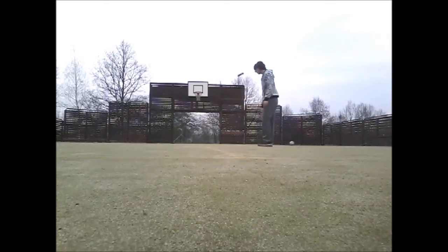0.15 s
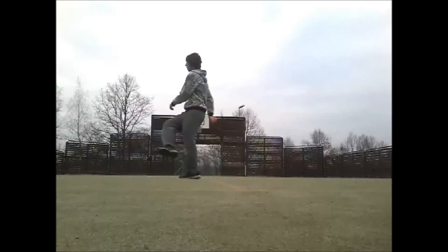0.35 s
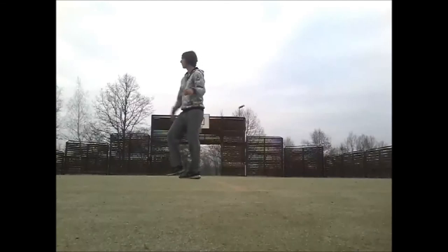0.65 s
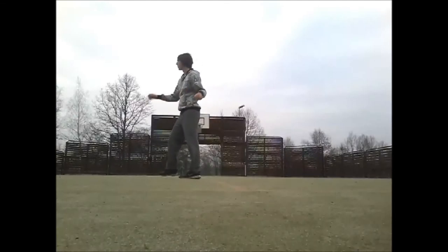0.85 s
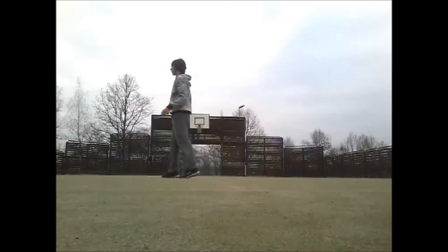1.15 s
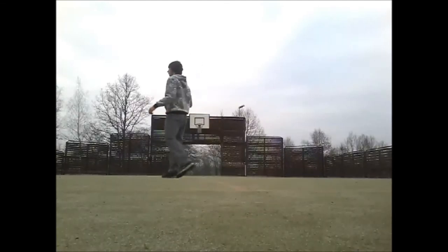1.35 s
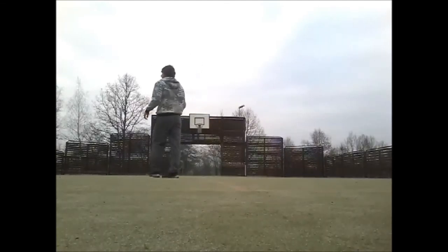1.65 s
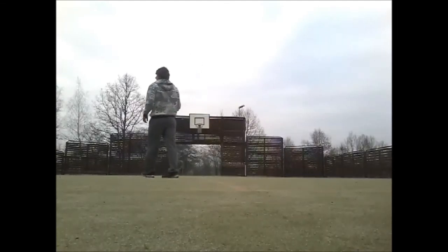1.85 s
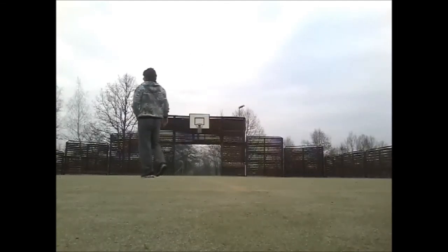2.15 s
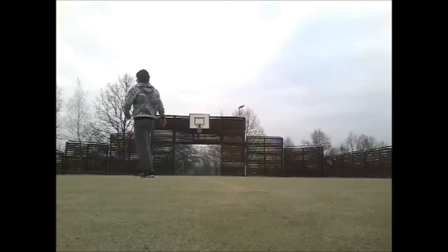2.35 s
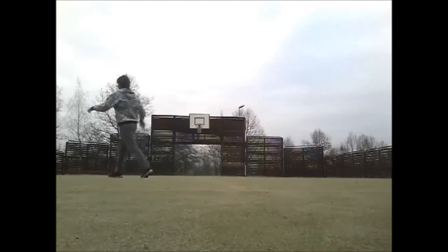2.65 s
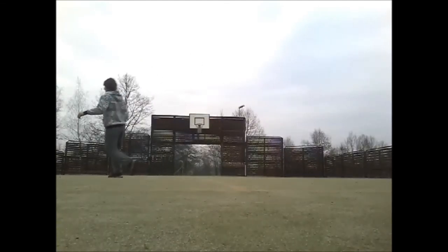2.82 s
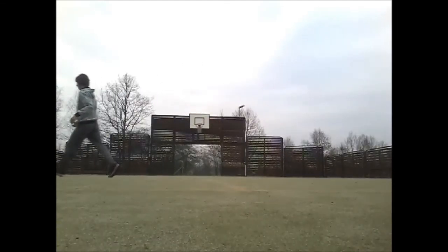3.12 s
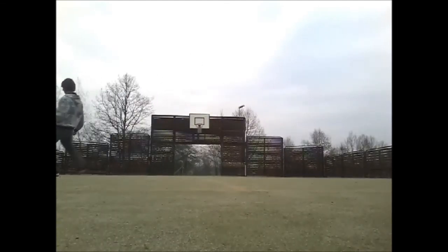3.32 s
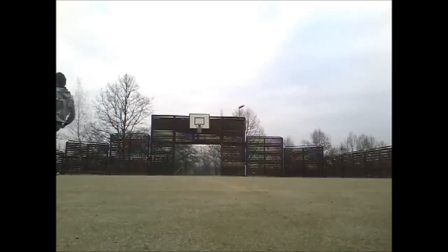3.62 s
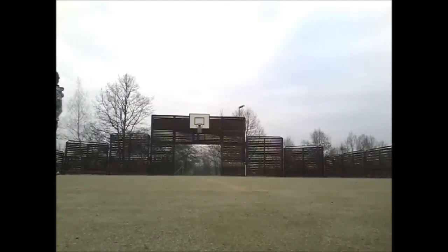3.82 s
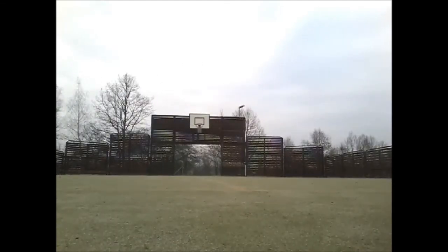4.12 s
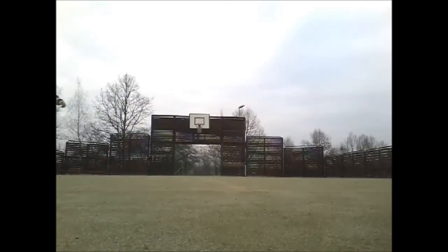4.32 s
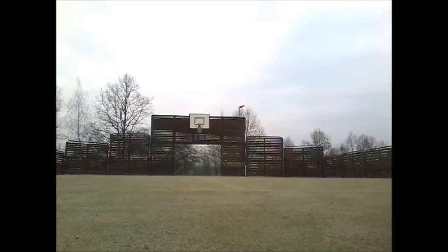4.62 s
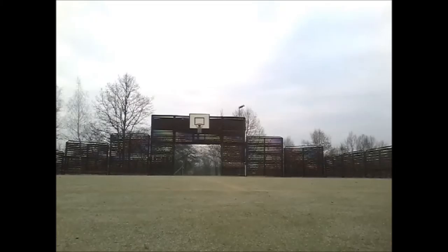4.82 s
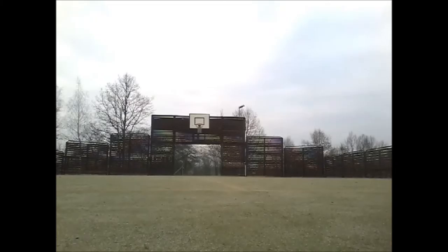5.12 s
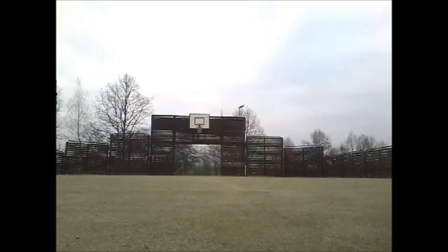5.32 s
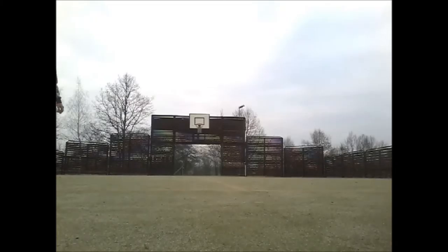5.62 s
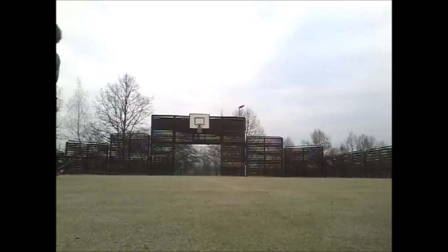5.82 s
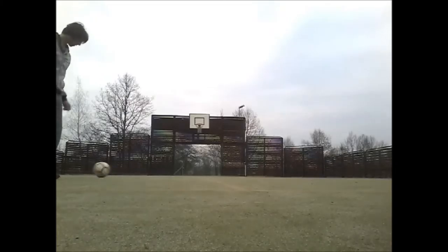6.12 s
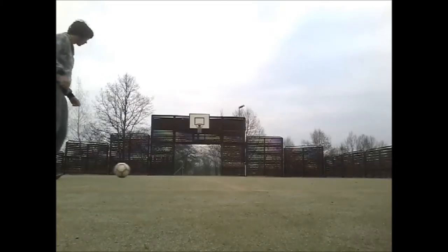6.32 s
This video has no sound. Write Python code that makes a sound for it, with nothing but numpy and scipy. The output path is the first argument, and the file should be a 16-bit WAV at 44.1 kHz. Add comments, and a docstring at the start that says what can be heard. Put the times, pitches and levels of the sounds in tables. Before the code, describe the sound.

Two football kicks each end in a clattering slam against a fence, followed by hops, gritty shoe scuffs and soft taps outdoors.

```python
"""A sanded artificial-grass court inside a slatted fence, heard from ground level.
Twice a football is kicked, skips and slams into the fence: the impact excites the panel's modes,
boards clatter on their steel frame, and the first slam leaves a loose slat rattling. The ball returns
in shortening hops and rolls on, ticking over its seams. Shoes grind the sand, the ball is stopped
and tapped along, and the fence reflects these sounds over a faint outdoor murmur."""
import sys
import numpy as np
from scipy import signal
from scipy.fft import rfft
from scipy.io import wavfile

SR = 44100
rng = np.random.default_rng(int(sys.argv[2]) if len(sys.argv) > 2 else 0)


def wav_record(signal):
    """Record a signal, one row per channel, as 16-bit PCM in the file named by sys.argv[1]."""
    frames = np.transpose(np.atleast_2d(signal))
    bounded = np.clip(frames, -1, 1)
    # unit amplitude maps onto the largest positive 16-bit level
    quanta = np.round(bounded * 32767).astype(np.int16)
    wavfile.write(sys.argv[1], SR, quanta)


N = 284886


def amp(db):
    return 10 ** (np.asarray(db) / 20)


def unit_rms(x):
    return x / np.sqrt(np.mean(x ** 2) + 1e-20)


def unit_peak(x):
    return x / np.max(abs(x))


def seconds(length):
    return np.arange(int(length * SR)) / SR


def decay(t, t60):
    """Exponential damping: 60 dB down after t60 seconds."""
    return np.exp(-np.log(1000) * t / t60)


def add(mix, start_s, sound):
    part = mix[max(round(start_s * SR), 0):][:len(sound)]
    part += sound[:len(part)]


def at_frequency(points, hz):
    """Interpolation on a logarithmic frequency axis."""
    known_hz, value = np.transpose(points)
    return np.interp(np.log(hz + 1), np.log(known_hz), value)


def click(spectrum, tilt_db=0, size=2048):
    """Minimum-phase pulse of unit energy, tilted by tilt_db per octave from 400 to 4000 Hz."""
    hz = abs(np.fft.fftfreq(size, 1 / SR))
    octaves = np.log2(np.clip(hz, 400, 4000))
    log_gain = np.log(amp(at_frequency(spectrum, hz) + tilt_db * octaves))
    pulse = np.fft.ifft(np.exp(np.conj(signal.hilbert(log_gain)))).real
    return pulse / np.linalg.norm(pulse)


def colour(x, spectrum, tilt_db=0):
    """Convolution with a pulse imposes its spectrum on x."""
    return signal.fftconvolve(x, click(spectrum, tilt_db))[:len(x)]


def ring(modes, t, signs=1):
    """Free vibration is a sum of damped sinusoidal modes."""
    hz, db, t60 = np.transpose(modes)[:, :, None]
    return np.sum(signs * amp(db) * decay(t, t60) * np.sin(2 * np.pi * hz * t), axis=0)


def grains(count, per_s, spread_db):
    """Shot noise: a random train of tiny, unequal impacts at unit rms."""
    size = amp(spread_db * np.minimum(rng.exponential(1, count), 3))
    return unit_rms(size * rng.choice([-1, 1], count) * (rng.random(count) < per_s / SR))


# Spectrum of the outdoor murmur. Each row: frequency in Hz, level in dB.
AIR_SPECTRUM = [(15, -54.5), (25, -20), (32, -11.5), (63, 3.5), (87, -6.5), (134, -2.5), (322, -9),
                (432, -7), (563, -10), (697, -9.5), (1220, -14), (2940, -19), (4380, -26.5), (6190, -20.5),
                (14500, -21.5)]
# Its envelope. Each row: time in seconds, level in dB.
AIR_ENVELOPE = [(0, -62.5), (.15, -64), (.23, -67.5), (1.9, -67), (2.45, -70.5), (3.2, -67.5),
                (6.46, -66.5)]


def air():
    """Ambient noise: a faint outdoor murmur."""
    gain = amp(np.interp(np.arange(N) / SR, *np.transpose(AIR_ENVELOPE)))
    return gain * colour(rng.standard_normal(N), AIR_SPECTRUM)


def hiss_burst(start_s=0.331, db=-61.5, t60=.7):
    """Decaying white noise: a brief, faint burst of hiss is heard at the first kick."""
    out, t = np.zeros(N), seconds(0.59)
    add(out, start_s, amp(db) * decay(t, t60) * rng.standard_normal(len(t)))
    return out


# Reflections from the sides of the court. Each entry: delay in seconds.
ECHO_DELAYS = [.0207, .036, .041, .063, .0795, .0865, .095, .108, .123, .153, .188]
# Spectrum of the reflected sound. Each row: frequency in Hz, level in dB.
ECHO_SPECTRUM = [(50, -15), (150, -15), (300, 4), (600, 0.5), (1500, -1), (2600, -0.5), (4000, -7),
                 (7000, -5), (14000, -13)]
# Reverberation time of the court. Each row: frequency in Hz, t60 in seconds.
REVERB_TIMES = [(80, 0.94), (500, 0.52), (1500, 0.55), (2500, 0.44), (4500, .4), (10000, 0.34)]


def court(x, echo_db, tail_db, fade_db_per_s=79):
    """Reflection adds echoes, smeared by the slats, and a diffuse tail that loses its treble first."""
    t, echoes = seconds(1), np.zeros(SR)
    for delay in ECHO_DELAYS:
        smear = 0.11 * rng.standard_normal(SR) * decay(t, .018)
        smear[0] += .8
        add(echoes, delay, amp(-7 - fade_db_per_s * delay) * smear)
    hz, when, bands = signal.stft(grains(SR, per_s=2000, spread_db=2), SR, nperseg=256)
    t60 = at_frequency(REVERB_TIMES, hz)[:, None]
    tail = signal.istft(bands * decay(when, t60), SR, nperseg=256)[1][:SR]
    tail *= 1 - np.exp(-(t / 0.12) ** 2)
    tone = click(ECHO_SPECTRUM)
    response = amp(echo_db) * echoes + amp(tail_db) * tail / np.linalg.norm(tail)
    response = signal.fftconvolve(response, tone / np.max(abs(rfft(tone))))
    return x + signal.fftconvolve(x, response)[:N]


# Spectrum returned by whole panels. Each row: frequency in Hz, level in dB.
PANEL_ECHO_SPECTRUM = [(40, -7.5), (90, -1.5), (320, 1), (500, -27), (1500, -12), (2500, -24.5),
                       (5000, -43.5), (14000, -59)]
# Their echoes. Each row: delay in seconds, gain in dB.
PANEL_ECHOES = [(0.038, -6), (0.088, -22), (.178, -14.5), (.189, -18)]


def panel_echoes(x):
    """Long waves do not slip between the slats: whole panels reflect them as dull bumps."""
    out = np.zeros(N)
    dull = colour(x, PANEL_ECHO_SPECTRUM) / np.max(abs(rfft(click(PANEL_ECHO_SPECTRUM))))
    for delay, db in PANEL_ECHOES:
        add(out, delay, amp(db) * dull)
    return out


def slat_scatter(x, rise_s=.11, t60=0.31, band_hz=(900, 2300)):
    """Scattering: countless small echoes swell as the wave reaches more slats, then thin out."""
    t = seconds(.6)
    echoes = rng.standard_normal(len(t)) * decay(t, t60) * (1 - np.exp(-(t / rise_s) ** 4))
    band = signal.butter(2, band_hz, "bandpass", fs=SR, output="sos")
    response = signal.sosfilt(band, echoes / np.linalg.norm(echoes))
    return amp(-1) * signal.fftconvolve(x, response)[:N]


# The rolling ball. Each row: start and end in seconds, first and last level in dB.
BALL_ROLLS = [(1.717, 2.35, -69.5, -83), (4.896, 5.42, -65.5, -64), (6.127, 6.398, -60.5, -64.5)]


def seam_ticks(gap_s=.0617, jitter_s=0.0016, spread_db=2.5, length_s=0.019, scrape_db=-19.5):
    """Rolling contact: the ball drops from seam to seam almost periodically. Gives rows for sand()."""
    rows = []
    for start, end, start_db, end_db in BALL_ROLLS:
        for s in np.arange(start, end, gap_s):
            late, harder = rng.standard_normal(2)
            db = np.interp(s, [start, end], [start_db, end_db]) + spread_db * harder
            rows.append((s + jitter_s * late, db, length_s, scrape_db))
    return rows


# Hops back from the fence. Each row: first landing and end in seconds, level in dB.
FENCE_REBOUNDS = [(1.118, 1.7, -35.5), (4.196, 4.87, -36)]
# Successive landings. Each entry: level in dB relative to the first.
LANDING_DROPS = [0, -4, -18.5, -18.5, -24]


def landings(first_hop_s=.218, hop_loss=.283, loss_easing=.52, length_s=.018, scrape_db=-6):
    """Inelastic rebound: hops shorten, and gentler landings lose less. Gives rows for sand()."""
    rows = []
    for s, end, db in FENCE_REBOUNDS:
        hop = first_hop_s
        for k, drop_db in enumerate(LANDING_DROPS):
            if s < end:
                rows.append((s, db + drop_db, length_s, scrape_db + drop_db))
            s += hop
            hop *= 1 - hop_loss * loss_easing ** k
    return rows


# Contacts of shoes and ball with the turf. Each row: middle in seconds, level in dB,
# length in seconds, low scrape in dB relative to the grit.
TURF_SCUFFS = [(0.355, -77.5, 0.066, 17), (2.177, -68.5, .025, -15), (3.294, -58, 0.045, 1),
               (3.322, -61.5, 0.041, -11.5), (3.376, -69, 0.04, 2), (4.606, -48.5, 0.032, -3),
               (5.164, -62.5, 0.041, -4), (5.243, -61, 0.028, -9), (5.433, -48.5, 0.035, 1),
               (5.461, -38.5, 0.047, -0.5), (5.597, -62, 0.18, 9.5), (5.652, -46.5, 0.01, -8),
               (5.684, -54.5, 0.04, 0.5), (6.043, -57, 0.025, -4)]
BALL_BOUNCES = [(0.498, -46, 0.03, -2.5), (0.758, -47.5, 0.022, -22), (3.956, -43, 0.023, -4.5),
                (5.82, -47, 0.018, -26), (6.016, -44.5, 0.02, -2)]
# Spectra of sand under light and heavy load. Each row: frequency in Hz, level in dB.
GRIT_SPECTRUM = [(100, -22), (800, -6.5), (1700, -11.5), (2400, -1), (3200, 1.5), (4000, -1), (4700, -4.5),
                 (5500, -1.5), (6500, -7.5), (7100, -17), (9500, -32), (14000, -36)]
SCRAPE_SPECTRUM = [(40, -14.5), (150, -6), (560, -11), (1000, -3), (1450, -3), (2150, 0.5), (3000, -11),
                   (6000, -38.5), (14000, -51.5)]


def sand(floor_db=-76.5, echo_s=.04, echo_db=-14.5):
    """Granular friction: sand grinds under sole or ball, and weight adds a lower scrape."""
    t, light, heavy = np.arange(N) / SR, np.zeros(N), np.zeros(N)
    for middle, db, length, scrape_db in TURF_SCUFFS + BALL_BOUNCES + landings() + seam_ticks():
        u = np.clip((t - middle) / length, -5, 5)
        # the contact bites quickly and lets go more slowly
        stroke = amp(db) * np.exp(-np.where(u < 0, abs(u / 0.44) ** 5, abs(u / 0.56) ** 1.8))
        light += stroke
        heavy += stroke * amp(scrape_db)
    knots = np.arange(0, N / SR, 1 / 40)
    clumps = amp(1.7 * np.interp(t, knots, rng.standard_normal(len(knots))))
    light += amp(floor_db) * unit_rms(clumps)  # faint crunching between the scuffs
    grit = colour(light * grains(N, per_s=2600, spread_db=3.5), GRIT_SPECTRUM)
    scrape = colour(heavy * grains(N, per_s=5200, spread_db=2), SCRAPE_SPECTRUM)
    out = grit + scrape
    add(out, echo_s, amp(echo_db) * out)  # reflection from the nearest stretch of fence
    return out


# Footfalls and touches of the ball. Each row: start in seconds, peak in dB, tilt in dB per octave.
SOFT_TAPS = [(0.306, -38.5, 4.5), (2.021, -54.5, -16), (3.220, -41, 7.5), (3.343, -43, -6),
             (5.181, -45.5, -11), (5.651, -32, -6), (5.678, -30.5, 0.5), (5.721, -38.5, -0.5),
             (5.805, -33.5, 29), (6.053, -34, -1.5), (6.448, -38, 3)]
# Their spectrum. Each row: frequency in Hz, level in dB.
TAP_SPECTRUM = [(30, -24.5), (100, -5.5), (220, -2), (380, -2.5), (650, 0.5), (1100, -11), (2200, -16),
                (4000, -24), (6500, -31.5), (8000, -46), (14000, -66.5)]


def taps(settle_s=0.053, pat_tilt_db=4):
    """Heavily damped impacts: steps, touches and the pat that opens each bounce settle without ringing."""
    out, t = np.zeros(N), seconds(settle_s)
    bounces = BALL_BOUNCES + landings()
    pats = [(middle - .28 * length, db + 1, pat_tilt_db) for middle, db, length, _ in bounces]
    for s, db, tilt_db in SOFT_TAPS + pats:
        contact = 0.058 * rng.standard_normal(len(t)) * decay(t, settle_s)
        contact[0] = 1
        add(out, s, amp(db) * unit_peak(colour(contact, TAP_SPECTRUM, tilt_db)))
    return out


# Modes of the loose slat. Each row: frequency in Hz, level in dB, t60 in seconds.
SLAT_MODES = [(321, -13, 0.031), (414, -17.5, 0.036), (1010, -28, 0.026), (1323, 8.5, 0.0041),
              (1440, -6, 0.0091), (2110, -12.5, 0.021), (2870, -8.5, 0.0046)]
# Spectrum of the boards beside it. Each row: frequency in Hz, level in dB.
SHAKEN_SPECTRUM = [(60, -37), (200, -31), (330, 4), (600, 1.5), (1100, 4), (1450, 2), (2200, -14),
                   (3200, -12.5), (7000, -29), (14000, -30)]


def loose_slat(start_s=1.0447, swing_s=.0694, count=10, fade_db=18, limp_db=2):
    """Periodic impact: a swinging slat clacks against its rail and shakes the neighbouring boards."""
    out, t = np.zeros(N), seconds(.12)
    for k in range(count):
        # the clacks hold up, then die away; every other one is harder
        db = -17.5 - fade_db * (k / (count - 1)) ** 2 - limp_db * (-1) ** k
        clack = ring(SLAT_MODES, t * rng.uniform(0.917, 1.02)) * (1 - np.exp(-(t / 0.0016) ** 2))
        shaken = colour(rng.standard_normal(len(t)) * decay(t, 0.13), SHAKEN_SPECTRUM)
        add(out, start_s + swing_s * k, amp(db) * (unit_peak(clack) + amp(-8.5) * unit_peak(shaken)))
    # a narrow slat radiates little bass
    return signal.sosfilt(signal.butter(2, 520, "highpass", fs=SR, output="sos"), out)


# Runs of lesser knocks. Each row: start and length in seconds, initial level in dB,
# tilt in dB per octave.
BOARD_CLATTERS = [(0.954, 0.08, -19, -1.5), (4.085, .095, -23, 5.5)]


def lesser_knocks(count=4, fade_db_per_s=69.5, spread_db=1.5, t60=.035, clank_db=-13):
    """Dissipation: irregular knocks weaken as the fence settles. Gives rows for board_knocks()."""
    rows = []
    for start, length, db, tilt_db in BOARD_CLATTERS:
        delays = length * (np.arange(count) + rng.random(count)) / count
        levels = db - fade_db_per_s * delays + spread_db * rng.standard_normal(count)
        rows += [(s, level, tilt_db, t60, clank_db) for s, level in zip(start + delays, levels)]
    return rows


# The loudest knocks. Each row: start in seconds, board's peak in dB, tilt in dB per octave,
# t60 in seconds, steel clank in dB relative to the board.
LOUD_KNOCKS = [(0.857, -21.5, 1, 0.03, -2), (0.895, -7.5, 1.5, .02, -11.5), (0.8993, -11, 0, .063, -19),
               (0.9255, -11, -1, 0.064, -35.5), (0.9346, -14.5, 3, 0.052, -1), (0.987, -15, -3, 0.03, -27),
               (1.315, -22.5, -5.5, .02, -32), (4.049, -17, 0, 0.044, -3.5),
               (4.0718, -21, -16, 0.064, -37.5), (4.079, -17.5, 10, 0.02, -6),
               (4.132, -13.5, 0.5, 0.051, -34), (4.2104, -24, 3, 0.14, -33)]
# Spectrum of a board. Each row: frequency in Hz, level in dB.
BOARD_SPECTRUM = [(40, -32.5), (100, -5.5), (220, -8.5), (400, -5), (700, -2), (1000, 1), (1300, 1),
                  (1700, -6.5), (2400, -12), (3300, -23), (4500, -27), (6200, -31), (8000, -44.5),
                  (14000, -61.5)]
# Modes of the steel frame. Each row: frequency in Hz, level in dB, t60 in seconds.
STEEL_MODES = [(2840, -6.5, 0.045), (3084, 0, 0.051), (3262, -1.5, 0.034), (3355, -6, .07),
               (3740, -6.5, 0.057)]


def board_knocks():
    """Impact excitation: a board knocks on its frame and sets the steel's modes clanking."""
    out, t = np.zeros(N), seconds(.15)
    for s, db, tilt_db, t60, clank_db in LOUD_KNOCKS + lesser_knocks():
        contact = rng.choice([-1, 1], len(t)) * decay(t, t60)
        contact[0] += 5  # the first touch is the hardest
        board = colour(contact, BOARD_SPECTRUM, tilt_db)
        detune = rng.uniform(0.95, 1.03)
        steel = ring(STEEL_MODES, t * detune, rng.choice([-1, 1], (len(STEEL_MODES), 1)))
        add(out, s, amp(db) * (unit_peak(board) + amp(clank_db) * unit_peak(steel)))
    return out


# The ball meets the fence. Each row: start in seconds, slap and thump in dB, slap tilt in dB per octave,
# chatter in dB, its t60 in seconds, its tilt in dB per octave, panel ring in dB.
FENCE_SLAMS = [(0.8573, -21, -21.5, 1.5, -22.5, 1.07, -0.5, -17),
               (4.0377, -1.5, -16.5, 1.5, -22.5, 0.46, 1.5, -33.5)]
# Modes of a fence panel. Each row: frequency in Hz, level in dB, t60 in seconds.
PANEL_MODES = [(97, -10, 0.48), (116.5, -14.5, 0.68), (147, -3, 0.48), (346, -13.5, 1), (403.5, -12.5, 1),
               (485, -8.5, 0.53), (534, -7.5, 1), (725, -7.5, 1), (740, -3.5, 0.68), (798, -5, 0.44),
               (878, -5.5, 0.61), (996, 1, 0.49), (1058, -0.5, .6), (1054, -1, 0.53), (1220, -0.5, 0.62),
               (1320, -7.5, 0.76)]


def struck_panel():
    """Resonance: each slam sets the panel's modes ringing while its many boards chatter."""
    out, t = np.zeros(N), seconds(1.6)
    for s, *_, chatter_db, t60, tilt_db, panel_db in FENCE_SLAMS:
        chatter = grains(len(t), per_s=1200, spread_db=1.5) * decay(t, t60) * (1 - np.exp(-t / 0.0034))
        add(out, s, amp(chatter_db) * colour(chatter, BOARD_SPECTRUM, tilt_db))
        signs = rng.choice([-1, 1], (len(PANEL_MODES), 1))
        panel = ring(PANEL_MODES, t, signs) * (1 - np.exp(-t / 0.052))
        add(out, s, amp(panel_db) * unit_peak(panel))
    return out


def shudder(relative_db=-23, cutoff_hz=170, t60=1.8):
    """Whole-body vibration: the struck panel sways with a low rumble that outlasts its ring."""
    out, t = np.zeros(N), seconds(1.5)
    lowpass = signal.butter(2, cutoff_hz, fs=SR, output="sos")
    for s, *_, panel_db in FENCE_SLAMS:
        sway = unit_rms(signal.sosfilt(lowpass, rng.standard_normal(len(t))))
        add(out, s, amp(panel_db + relative_db) * sway * decay(t, t60))
    return out


# The shoe meets the ball. Each row: start in seconds, slap and thump in dB, slap tilt in dB per octave.
BALL_KICKS = [(0.3318, -36.5, -49.5, -3), (3.5459, -12.5, -22, -1)]
# Spectra of the skin's slap and the squashed ball's push. Each row: frequency in Hz, level in dB.
SLAP_SPECTRUM = [(40, -21), (120, -3), (300, 3), (480, -8), (750, 2.5), (1300, 1), (2600, -2.5),
                 (4000, -7.5), (6200, -18.5), (7300, -38.5), (14000, -45.5)]
THUMP_SPECTRUM = [(30, -26), (60, -4.5), (95, 0.5), (160, -2), (230, -7), (330, -8.5), (500, -18),
                  (1200, -47), (6000, -81)]
# Modes of the hollow shell. Each row: frequency in Hz, level in dB, t60 in seconds.
SHELL_MODES = [(250, -7, 0.023), (393, -4.5, 0.018), (630, 1, 0.02), (812, -4, 0.0028), (1142, -3, .012)]


def ball(s, slap_db, thump_db, tilt_db):
    """Elastic impact: the skin slaps, the squashed ball pushes out a thump and pings as it recovers."""
    out = np.zeros(N)
    add(out, s, amp(slap_db) * unit_peak(click(SLAP_SPECTRUM, tilt_db)))
    add(out, s, amp(thump_db) * unit_peak(click(THUMP_SPECTRUM, size=4096)))
    add(out, s + .002, amp(thump_db) * unit_peak(ring(SHELL_MODES, seconds(.1))))
    return out


def skin_crumple():
    """Deformation noise: the ball's skin crumples against shoe or boards for a few milliseconds."""
    out, t = np.zeros(N), seconds(.08)
    for s, _, thump_db, tilt_db, *_ in BALL_KICKS + FENCE_SLAMS:
        skin = colour(rng.standard_normal(len(t)) * decay(t, 0.018), SLAP_SPECTRUM, tilt_db)
        add(out, s, amp(thump_db + 4) * unit_peak(skin))
    return out


def scene():
    """Superposition: ball, fence and turf, each with its share of echo, over the open air."""
    kicks = sum(ball(*row) for row in BALL_KICKS)
    slams = sum(ball(*row[:4]) for row in FENCE_SLAMS)
    bumps = panel_echoes(kicks + amp(-1) * slams)
    kicks = court(kicks, echo_db=8.5, tail_db=-7.5) + slat_scatter(kicks)
    fence = court(slams + struck_panel() + board_knocks() + shudder(), echo_db=-6, tail_db=-15.5)
    slat = court(loose_slat(), echo_db=-11, tail_db=-23.5)
    turf = court(sand() + taps(), echo_db=-10, tail_db=-24.5)
    return (kicks + skin_crumple() + bumps + fence + slat + turf + air() + hiss_burst())[None]


def record(dry, low_hz=52, high_hz=14750, follow_s=.05):
    """Band limiting: a small microphone loses deep bass and top treble; hiss swells after loud sounds."""
    heard = signal.sosfilt(signal.butter(3, low_hz, "highpass", fs=SR, output="sos"), dry)
    pole = np.exp(-1 / (follow_s * SR))
    loudness = np.sqrt(signal.lfilter([1 - pole], [1, -pole], heard[0] ** 2))
    swell = signal.lfilter([1 - pole], [1, -pole], loudness / (loudness + amp(-40.5)))
    hiss = amp(-56.5) * swell * rng.standard_normal(N)
    lowpass = signal.firwin(801, high_hz, window=("kaiser", 8), fs=SR)
    return signal.oaconvolve(heard + hiss, lowpass[None], "same")


dry = scene()
out = record(dry)
wav_record(out)
```